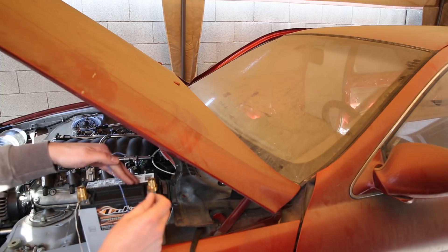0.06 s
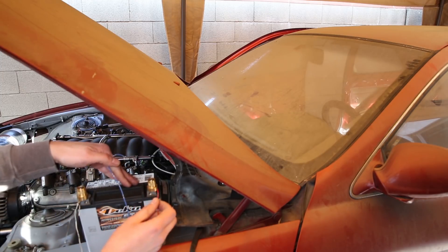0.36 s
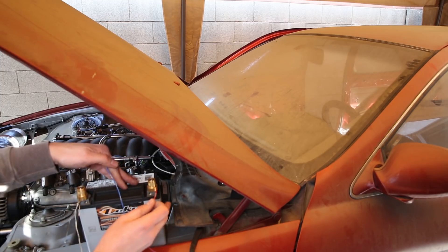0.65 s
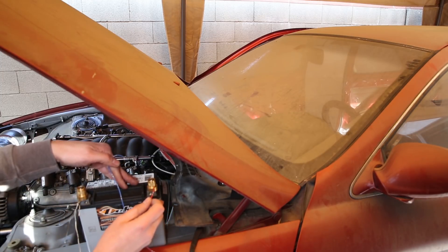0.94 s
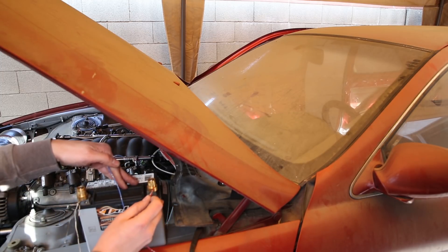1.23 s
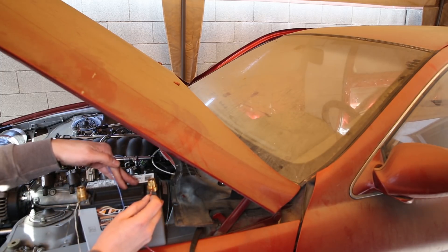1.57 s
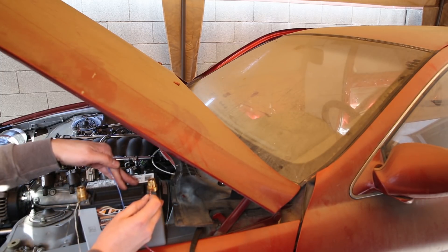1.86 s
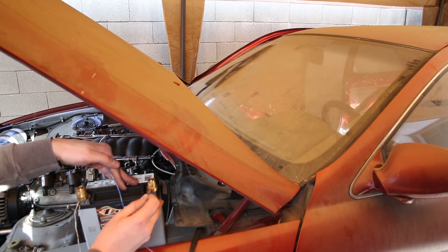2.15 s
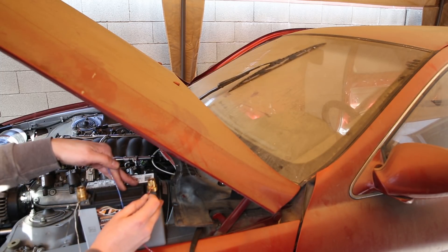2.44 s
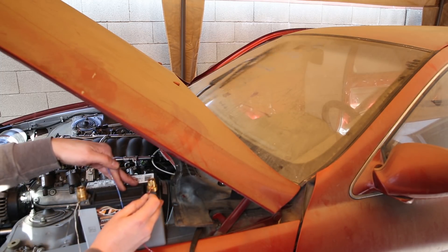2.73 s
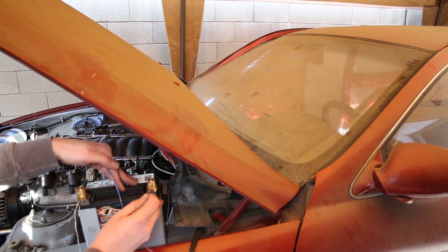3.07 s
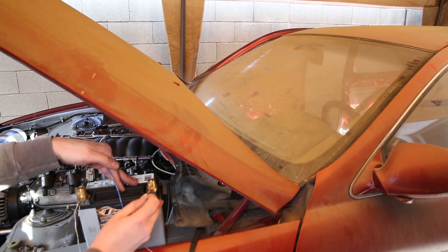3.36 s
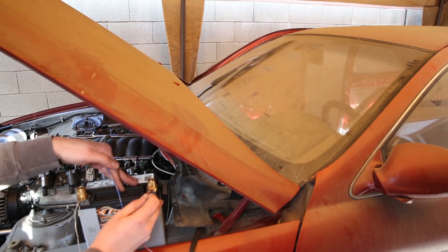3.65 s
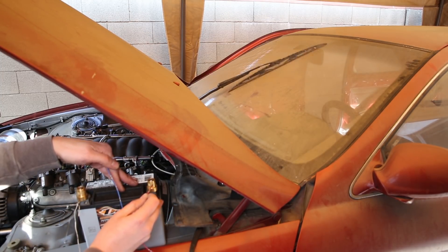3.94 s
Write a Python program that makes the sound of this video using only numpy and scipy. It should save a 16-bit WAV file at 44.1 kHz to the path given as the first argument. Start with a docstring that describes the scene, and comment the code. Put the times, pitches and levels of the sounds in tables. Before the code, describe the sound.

In a garage, clips tap a car battery a few times. After a pause, dry wipers sweep three times near the microphone, rubbing, juddering and faintly squealing as the linkage knocks and the blades thud.

```python
"""Dry wipers in a garage

A stereo microphone near a car with its bonnet open, over the low wash of the garage. Leads click against the
battery, then the wipers drag over dry glass for three strokes. The rubber sticks and slips: it hisses, groans
and chatters, shaking windscreen and cowl, and a wiper arm rings on a high note. The linkage knocks as its play
is taken up, and a blade thuds where it catches and jumps."""
import sys
import numpy as np
from scipy import signal
from scipy.fft import rfft, irfft
from scipy.io import wavfile

SR = 44100
rng = np.random.default_rng(int(sys.argv[2]) if len(sys.argv) > 2 else 0)


def to_wav(s):
    """Save 16-bit WAV."""
    ch = np.atleast_2d(s).T  # columns
    pcm = np.round(np.clip(ch, -1, 1) * 32767)  # PCM
    wavfile.write(sys.argv[1], SR, pcm.astype(np.int16))


N = 176400
TIME = np.arange(N) / SR
BINS = np.fft.rfftfreq(16384, 1 / SR)  # frequencies in Hz of every dB curve

# One list per wiper stroke. Each row: time in seconds, then relative levels in dB of the
# bass, body, rasp, hiss and fizz.
STROKES = [
    [(1.8, -60, -40, -51, -80, -80), (1.858, -64, -43, -61, -74, -57), (1.886, -39, -33.5, -52, -56, -57),
     (2.0, -42, -40, -47.5, -47.5, -45.5), (2.114, -51, -42, -52, -47.5, -44.5),
     (2.226, -24, -27.5, -47, -43, -41.5), (2.284, -24, -22.5, -33.5, -38, -40),
     (2.326, -25, -18, -30.5, -35, -36), (2.486, -26.5, -21.5, -34, -38.5, -39),
     (2.542, -35, -25.5, -42, -44, -44), (2.58, -33, -29.5, -60, -55.5, -57),
     (2.62, -31, -48, -64, -75, -79)],
    [(2.62, -46, -46, -61, -77, -76), (2.652, -29, -37, -61, -45, -41), (2.676, -41, -51, -57, -44, -35.5),
     (2.712, -51, -29.5, -50.5, -41, -38), (2.866, -33, -23.5, -34, -42, -38.5),
     (2.916, -48, -21.5, -33, -32.5, -36), (2.988, -29, -18, -32, -39.5, -41),
     (3.054, -32, -27, -38.5, -43.5, -46), (3.09, -31, -18.5, -30, -39, -37),
     (3.23, -31.5, -24.5, -33.5, -42, -43), (3.238, -23.5, -26.5, -35, -42.5, -50),
     (3.33, -49, -37, -61, -65, -73)],
    [(3.33, -48, -31, -46, -67, -71), (3.348, -57, -34, -60, -58, -63), (3.386, -38, -22, -31, -41, -44),
     (3.554, -36, -19.5, -32.5, -40, -42), (3.604, -32, -27, -33, -38, -42.5),
     (3.664, -24.5, -20.5, -31, -35.5, -37), (3.7, -30, -21, -33.5, -37, -42),
     (3.754, -22, -17.5, -29, -31.5, -34), (3.784, -24, -18.5, -30.5, -32.5, -34.5),
     (3.95, -31.5, -23.5, -36.5, -41, -40.5), (3.988, -35, -31, -63, -53, -60),
     (4.0, -39, -34, -55, -59, -65)],
]
# Resonances of windscreen, cowl and wiper arms. Each row: frequency in Hz, width in Hz, lift in dB.
PANEL_MODES = [(49, 8, 5), (98, 11, 6), (133, 14, 3), (190, 16, 2), (271, 16, 3.5), (302, 14, 3),
               (548, 18, 7), (598, 22, 3), (703, 26, 3), (916, 24, 3), (1493, 40, 4), (1730, 60, 3),
               (2036, 36, 4), (3262, 60, 4.5), (3978, 60, 5), (4162, 40, 6), (7485, 300, 2.5),
               (9641, 170, 4.5)]
# Stereo spread of wipers and room. Each row: frequency in Hz, side minus mid in dB.
WIDTH = [(60, -18), (300, -16.5), (1000, -13.5), (2000, -17.5), (4000, -7.5), (12000, -5)]


def amp(db):
    """Decibels to gain."""
    return 10 ** (np.asarray(db) / 20)


def unit_rms(x):
    """Scales to rms 1."""
    return x / np.sqrt(np.mean(x ** 2) + 1e-20)


def curve(points):
    """Joins (Hz, value) points by lines on a log-frequency axis."""
    hz, value = np.transpose(points)
    return np.interp(np.log(BINS + 1), np.log(hz + 1), value)


def add(mix, start, sound):
    """Mixes a sound in at a start in seconds."""
    part = mix[..., round(start * SR):][..., :sound.shape[-1]]
    part += sound[..., :part.shape[-1]]


def response(db):
    """Causal impulse response with a given dB curve."""
    log_gain = np.log(amp(np.r_[db, db[-2:0:-1]]))
    return np.fft.ifft(np.exp(np.conj(signal.hilbert(log_gain)))).real[:6000]


def colour(x, db):
    """Filters by a dB curve."""
    return signal.fftconvolve(x, response(db))[:N]


def wander(rate_hz):
    """Random drift of rms 1, mostly slower than the given rate."""
    rolloff = 1 + (np.fft.rfftfreq(N, 1 / SR) / rate_hz) ** 4
    return unit_rms(irfft(rfft(rng.standard_normal(N)) / rolloff, N))


def burst(envelope, db):
    """Direct and diffuse noise under an envelope, through a colour of unit power."""
    ring = response(db)
    noise = rng.standard_normal((2, len(envelope))) * envelope
    return signal.fftconvolve(noise, ring[None] / np.linalg.norm(ring), axes=1)


def stereo(mid, side, width):
    """Left and right from a direct and a diffuse part."""
    side = colour(side, curve(width))
    return np.array([mid + side, mid - side])


def room_tone(level_db=-43.5):
    """The steady low wash of the garage, all round the microphone."""
    # Each row: frequency in Hz, relative level in dB.
    spectrum = [(15, -47), (25, -28), (48, -11.5), (84, -5), (117, 2), (145, -4.5), (223, -3.5),
                (293, -7.5), (363, -6), (476, -11), (516, -11), (695, -5), (2910, -30.5), (12900, -37),
                (16000, -35.5)]
    # Each row: frequency in Hz, side minus mid in dB.
    spread = [(60, -13.5), (240, -5), (950, -7), (3770, -2), (15000, 1.5)]
    mid, side = [colour(rng.standard_normal(N), curve(spectrum)) for _ in range(2)]
    return amp(level_db) * unit_rms(stereo(mid, side, spread))


def battery_leads(rise_s=0.0027, clatter_t60=0.16, tail_t60=0.51, tick_s=0.0019):
    """Clips tap the terminals, ring and clatter round the engine bay; the wires tick faintly."""
    # Each row: start in seconds, level in dB, brightness in dB per octave, clamp ring from 0 to 1.
    clicks = [(.099, -29.5, 1.8, 1), (0.332, -37.5, -1, 0.2), (0.506, -41, -2.5, 0.8),
              (0.775, -37.5, -3, 0.1), (.799, -40, -1, .05), (.807, -39.5, -3, .05)]
    # Dry ticks of the wires. Each row: start in seconds, level in dB.
    ticks = [(.032, -45), (0.41, -43), (0.445, -48), (0.463, -44), (1.744, -41.5)]
    # Colour of clicks and ticks. Each row: frequency in Hz, relative level in dB.
    spectrum = [(80, -6.5), (420, 7), (900, 5), (1400, 3), (2500, -1.5), (4000, -2.5), (6000, -11.5),
                (9000, -17.5), (16000, -31)]
    # The battery clamp. Each row: frequency in Hz, level in dB, seconds to fall 60 dB.
    clamp_modes = [(431, -13, .35), (1168, -15, .28), (1793, -11, .4)]
    # Spread of the engine bay. Each row: frequency in Hz, side minus mid in dB.
    bay_width = [(200, -18), (1000, -14), (4000, -7), (12000, 2)]
    out, t = np.zeros((2, N)), TIME[:SR // 2]
    rise = np.minimum(t / rise_s, 1)
    clatter = rise * amp(-60 * t / clatter_t60)
    tail = rise * amp(-11 - 60 * t / tail_t60)
    clamp = sum(amp(db - 60 * t / t60) * np.sin(2 * np.pi * hz * t) for hz, db, t60 in clamp_modes)
    octaves = np.log2(1 + BINS / 1000)
    for start, db, tilt, ring in clicks:
        tone = curve(spectrum) + tilt * octaves
        add(out, start, amp(db) * (burst(clatter, tone) + burst(tail, tone)))
        add(out[0], start, amp(db) * ring * clamp)  # dead centre
    for start, db in ticks:
        add(out, start, amp(db) * burst(np.exp(-t / tick_s), curve(spectrum)))
    return stereo(*out, bay_width)


def through_panels(spectrum):
    """The dB curve of a spectrum once glass, cowl and arms have added their resonances."""
    peaks = sum((amp(db) ** 2 - 1) / (1 + (2 * (BINS - hz) / width) ** 2)
                for hz, width, db in PANEL_MODES)
    return curve(spectrum) + 10 * np.log10(1 + peaks)


def stick_slip(rise_s=0.0011, decay_s=0.011, jitter=0.015):
    """The blades' force surges at each slip and dies quickly; returns force and chatter depth."""
    # Each row: time in seconds, slips per second, depth from 0 to 1.
    chatter = [(2.15, 63, .05), (2.23, 56, 0.6), (2.33, 46.3, 0.67), (2.55, 59, 0.74), (2.65, 66, 0.1),
               (2.901, 50, 0.1), (3.1, 43, 0.75), (3.4, 48, 0.9), (3.6, 49.8, 0.5), (3.751, 51, 1),
               (3.97, 57, 0.6)]
    times, rates, depths = np.transpose(chatter)
    rate = np.interp(TIME, times, rates)
    slip_count = np.cumsum(rate * (1 + jitter * wander(22))) / SR
    strength = amp(rng.uniform(-4.2, 3, N))[slip_count.astype(int)]  # one draw per slip
    age = (slip_count % 1) / rate
    force = strength * (1 - np.exp(-age / rise_s)) * np.exp(-age / decay_s)
    return unit_rms(force), np.interp(TIME, times, depths)


def friction(level_db, spectrum, chatter, chatter_share, grain_db):
    """Tiny grains of friction, bunched by the slips, ring the glass and cowl."""
    force, depth = chatter
    depth = depth * chatter_share
    times = np.vstack(STROKES)[:, 0]
    fade_in = np.clip((TIME - times[0]) / 0.022, 0, 1)
    level = amp(np.interp(TIME, times, level_db)) * fade_in
    grains = unit_rms(amp(grain_db * wander(610).clip(-2, 2)))
    drive = level * np.sqrt(1 - depth + depth * force ** 2) * grains
    tone = through_panels(spectrum)
    mid, side = [colour(drive * rng.standard_normal(N), tone) for _ in range(2)]
    return stereo(mid, side, WIDTH) / np.linalg.norm(response(tone))


def blade_rub():
    """Dry rubber on glass, from the rumble of the screen up to the fizz of the lip."""
    # Five colours of rubbing, low to high. Each row: frequency in Hz, relative level in dB.
    bass = [(20, -34), (36, -39), (48, -9.5), (62, -21), (80, -1), (100, -3.5), (125, -1.5), (170, -15),
            (400, -48)]
    body = [(50, -66.5), (90, -17.5), (130, -0.5), (200, 0.5), (290, 2.5), (450, -3.5), (650, -5),
            (850, -11.5), (1200, -25.5), (2500, -36.5), (6000, -89)]
    rasp = [(300, -36.5), (800, 2.5), (1450, -0.5), (2100, -8), (2900, -8.5), (3900, -11.5), (5200, -13.5),
            (9000, -18), (16000, -56)]
    hiss = [(500, -51), (1100, -6), (3000, -1.5), (5200, -6), (7300, 3.5), (9600, 0), (12000, -7.5),
            (16000, -35)]
    fizz = [(2500, -24), (7000, -12), (10500, -0.5), (13500, 1.5), (16000, -5)]
    _, bass_db, body_db, rasp_db, hiss_db, fizz_db = np.vstack(STROKES).T
    chatter = stick_slip()
    return (friction(bass_db - 2.5, bass, chatter, chatter_share=0.85, grain_db=-0.5)
            + friction(body_db, body, chatter, chatter_share=0.54, grain_db=2.0)
            + friction(rasp_db + 0.23, rasp, chatter, chatter_share=0.58, grain_db=1.5)
            + friction(hiss_db + 0.27, hiss, chatter, chatter_share=0.61, grain_db=2.9)
            + friction(fizz_db + 0.5, fizz, chatter, chatter_share=1.0, grain_db=0.5))


def garage_reverb(x):
    """The walls answer with a diffuse tail, longest in the mids and shortest in the treble."""
    # Each row: frequency in Hz, seconds to fall 60 dB.
    decay_times = [(100, 0.35), (400, 0.23), (1500, 0.79), (5000, 0.093), (15000, 0.074)]
    hz, t, noise = signal.stft(rng.standard_normal((2, SR // 2)), SR, nperseg=256)
    t60 = np.interp(hz, BINS, curve(decay_times))[:, None]
    _, tails = signal.istft(noise * amp(-60 * t / t60), SR, nperseg=256)
    mid, side = [signal.fftconvolve(x, tail / np.linalg.norm(tail))[:N] for tail in tails]
    return stereo(mid, side, WIDTH)


def linkage_knocks(rise_s=0.0015):
    """Play in the linkage is taken up with a ringing knock."""
    # Each row: start in seconds, level in dB.
    knocks = [(1.831, -30.5), (1.891, -36), (2.713, -25.5), (3.074, -15.5), (3.2045, -7), (3.211, -19),
              (3.228, -27), (3.366, -17), (3.386, -13)]
    # Each row: frequency in Hz, relative level in dB, seconds to fall 60 dB.
    linkage_modes = [(308, -12, 0.054), (528, -10.5, 0.24), (656.5, 7, 0.056), (700, 2.5, 0.066),
                     (827, -4.5, 0.056), (918, -4.5, 0.11), (1120, -6, 0.035), (1750, -16.5, 0.11)]
    out, t = np.zeros(N), TIME[:SR // 2]
    for start, db in knocks:
        ring = sum(amp(mode_db - 60 * t / t60) * np.sin(2 * np.pi * (hz * t + rng.random()))
                   for hz, mode_db, t60 in linkage_modes)
        add(out, start, amp(db) * ring / abs(ring).max() * np.minimum(t / rise_s, 1))
    return out


def rubber_groans(waver=0.025, roughness=0.25, octave_db=-24):
    """The rubber sings briefly, its pitch gliding as the blade changes speed."""
    # Each row: start and length in seconds, first and last pitch in Hz, level in dB.
    groans = [(1.87, .13, 353, 309, -36), (2.02, 0.11, 312, 292, -31), (2.1, 0.1, 287, 232, -29.5),
              (2.22, 0.2, 111.2, 88.4, -21.5), (2.67, 0.12, 255.7, 266, -28),
              (2.69, 0.136, 571, 561, -30.5), (2.745, 0.18, 151.7, 125, -21), (2.8, .13, 267.5, 208, -25),
              (2.91, 0.17, 202, 181, -14), (3.09, 0.088, 292, 277, -27), (3.351, 0.103, 631, 597, -26.5),
              (3.41, 0.11, 163.6, 170, -27), (3.48, 0.16, 259.7, 307, -24), (3.58, 0.14, 210.4, 217, -25)]
    out, drift = np.zeros(N), 1 + waver * wander(60)
    for start, length, first_hz, last_hz, db in groans:
        progress = np.linspace(0, 1, int(length * SR))
        glide = first_hz * (last_hz / first_hz) ** progress
        pitch = glide * drift[round(start * SR):][:len(progress)]
        phase = 2 * np.pi * np.cumsum(pitch) / SR
        note = np.sin(phase) + amp(octave_db) * np.sin(2 * phase)
        add(out, start, amp(db) * np.sin(np.pi * progress) * note)
    return out * (1 + roughness * wander(80))


def lip_snaps(decay_s=0.0048):
    """The lip of a blade lets go with a sharp tick."""
    # Each row: start in seconds, level in dB.
    snaps = [(2.212, -32), (2.23, -35), (2.247, -34), (3.07, -33), (3.091, -37), (3.181, -35),
             (3.213, -29.5), (3.38, -31), (3.433, -31.5), (3.691, -21.5), (3.771, -25)]
    # Each row: frequency in Hz, relative level in dB.
    spectrum = [(500, -34), (2500, -19), (5500, -8), (8000, -5), (10500, -10), (16000, -17)]
    out, crack = np.zeros((2, N)), np.exp(-TIME[:SR // 10] / decay_s)
    for start, db in snaps:
        add(out, start, amp(db) * burst(crack, through_panels(spectrum)))
    return stereo(*out, WIDTH)


def arm_squeals(pitch_hz=4165, waver=0.019, roughness=0.25):
    """Pressed hard, a wiper arm rings faintly on one unsteady high note."""
    # Each row: start and length in seconds, level in dB.
    squeals = [(2.34, 0.23, -51), (3.15, 0.17, -48), (3.67, 0.25, -39.5)]
    pitch = pitch_hz * (1 + waver * wander(297))
    note = np.sin(2 * np.pi * np.cumsum(pitch) / SR)
    envelope = np.zeros(N)
    for start, length, db in squeals:
        add(envelope, start, amp(db) * np.sin(np.linspace(0, np.pi, int(length * SR))))
    return envelope * note * (1 + roughness * wander(150))


def blade_thuds():
    """A blade catches, jumps and thuds on the screen."""
    # Each row: start in seconds, level in dB.
    thuds = [(2.37, -7.5), (2.544, -15), (3.115, -17), (3.413, -12.5), (3.435, -21), (3.454, -7.5),
             (3.479, -10.5), (3.5, -15), (3.555, -12), (3.774, -15), (3.799, -23)]
    # Each row: frequency in Hz, relative level in dB.
    spectrum = [(20, -63), (70, -28.5), (120, -4.5), (175, -4), (250, -3.5), (340, -7.5), (600, -24),
                (1500, -34), (8000, -57)]
    out, thud = np.zeros(N), response(through_panels(spectrum))
    for start, db in thuds:
        add(out, start, amp(db) * thud / abs(thud).max())
    return out


def scene(rub_reverb_db=-14, knock_reverb_db=-9):
    """Wipers and battery leads close up, the garage behind, the bass leaning to the right."""
    # Balance of wipers and room. Each row: frequency in Hz, left minus right in dB.
    balance = [(35, -2.5), (80, -6), (160, -2.5), (320, -0.8), (2000, -0.2), (6000, -1), (14000, -0.5)]
    rubbing = blade_rub() + lip_snaps()
    knocking = linkage_knocks() + blade_thuds()
    wipers = rubbing + rubber_groans() + arm_squeals() + knocking
    reverb = garage_reverb(amp(rub_reverb_db) * rubbing.mean(0) + amp(knock_reverb_db) * knocking)
    left, right = wipers + reverb + room_tone()
    lean_db = curve(balance) / 2
    return np.array([colour(left, lean_db), colour(right, -lean_db)]) + battery_leads()


def record(dry):
    """The recorder's band limit cuts the top treble off both channels."""
    edge_hz = 16050
    lowpass = signal.firwin(511, edge_hz, window=("kaiser", 9), fs=SR)
    return signal.oaconvolve(dry, lowpass[None], "same")


dry = scene()
out = record(dry)
to_wav(out)
```